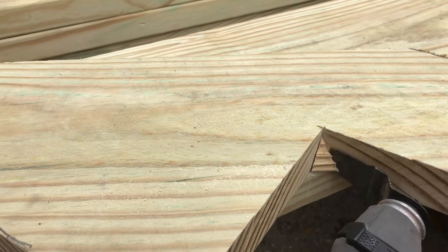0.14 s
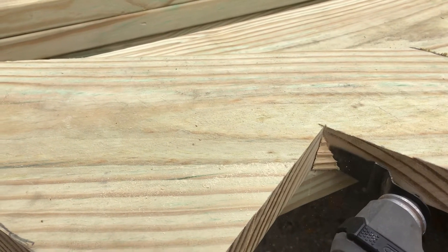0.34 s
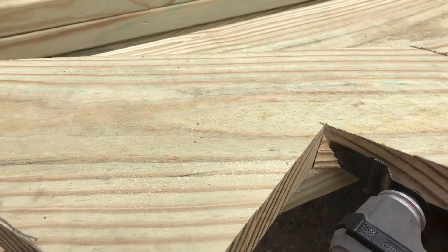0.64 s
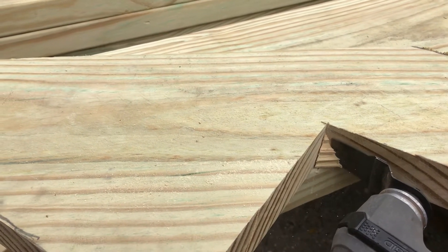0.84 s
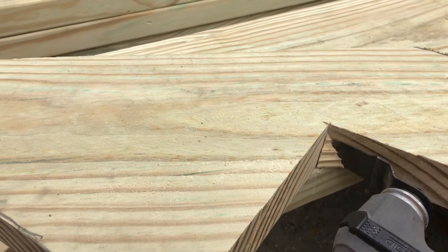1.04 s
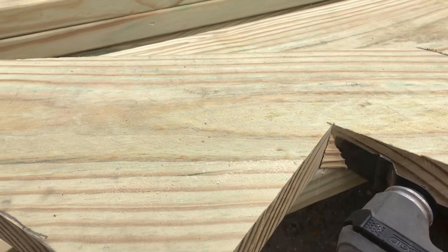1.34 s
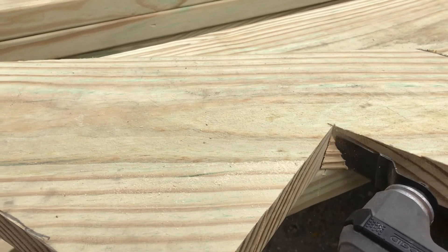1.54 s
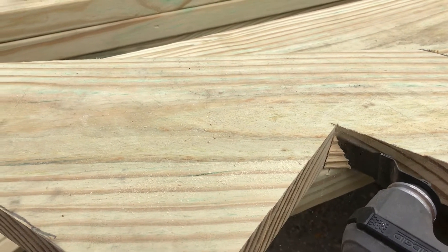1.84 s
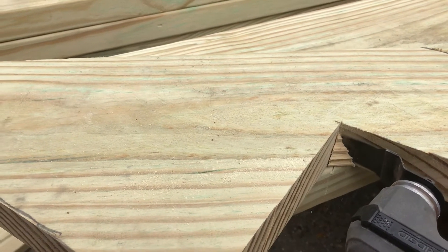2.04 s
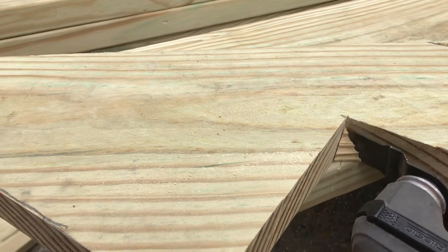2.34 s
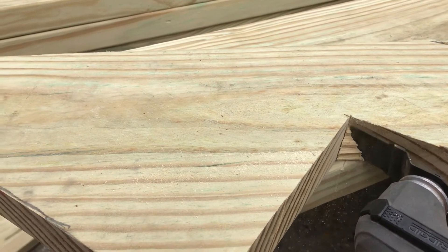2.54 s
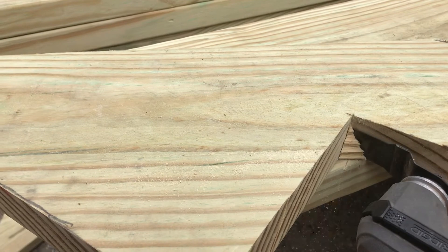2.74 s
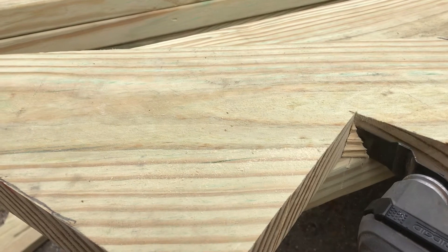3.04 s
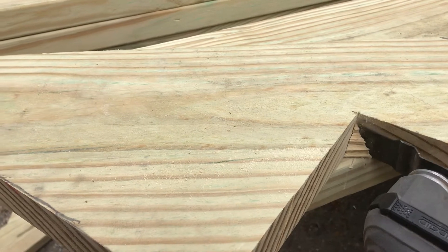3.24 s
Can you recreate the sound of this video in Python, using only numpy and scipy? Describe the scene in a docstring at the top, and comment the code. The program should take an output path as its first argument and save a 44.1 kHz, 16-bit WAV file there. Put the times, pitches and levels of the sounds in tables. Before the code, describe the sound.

Close, raspy power-tool buzz sawing wood, its pitch sagging twice under load and recovering.

```python
"""An oscillating multi-tool saws a thick board, heard close up in mono through a phone.
The blade swings about 270 times a second and sags under load; each swing sounds a stack of overtones
as sine partials with their own swells and wavering. The teeth rasp through the wood on both strokes:
hiss and small clicks, gated by the swing. A faint rumble of shaped noise and a few low, falling
sine bumps lie underneath."""
import sys
import numpy as np
from scipy import signal
from scipy.fft import rfft, irfft, next_fast_len
from scipy.io import wavfile
from scipy.ndimage import uniform_filter1d

SR = 44100
rng = np.random.default_rng(int(sys.argv[2]) if len(sys.argv) > 2 else 0)


def dump(signal):
    """Clip the signal to [-1, 1] and save it as 16-bit WAV at the path in sys.argv[1]."""
    limited = np.clip(np.atleast_2d(signal).T, -1, 1)
    pcm = np.round(limited * 32767).astype(np.int16)
    wavfile.write(sys.argv[1], SR, pcm)


def invert_db(level):
    """Linear amplitude ratio for a level in decibels (20 dB per decade), elementwise."""
    return 10 ** (np.asarray(level, dtype=float) / 20)


N = 149940
TIME_S = np.arange(N) / SR
FREE_HZ = 272  # swing rate of the unloaded blade
CUTOFF_HZ = 15740  # top of the sound


def curve(table, col):
    """Column of a time table, one value a sample."""
    a = np.array(table, float)
    return np.interp(TIME_S, a[:, 0], a[:, col])


def shape_db(table, hz):
    """Spectrum table read on a log frequency axis."""
    a = np.array(table, float)
    return np.interp(np.log(np.maximum(hz, 1)), np.log(a[:, 0]), a[:, 1])


def colour(x, gain):
    """Filter by a gain that is a function of Hz."""
    n = next_fast_len(N)
    hz = np.arange(n // 2 + 1) * SR / n
    return irfft(rfft(x, n) * gain(hz), n)[:N]


def unit(x):
    """Scale to rms 1."""
    return x / np.sqrt(np.mean(x ** 2))


def walk(rate_hz):
    """Random levels, held and smoothed twice into a slow wander of rms 1."""
    hold = int(SR / rate_hz)
    w = np.repeat(rng.standard_normal(N // 200), hold)[:N]
    return unit(uniform_filter1d(uniform_filter1d(w, hold), hold))


def above(hz, edge_hz):
    """Smooth step from 0 below the edge to 1 above it."""
    return 1 / (1 + (edge_hz / np.maximum(hz, 1)) ** 10)


def flare_db(rows):
    """Flat-topped swells and dips in dB, from rows of centre, half length and gain."""
    return sum(db * np.exp(-((TIME_S - s) / max(half, .008)) ** 4) for s, half, db in rows)


def lost_speed(swing_hz, most=1):
    """Load on the blade as the share of its free speed that is lost."""
    return np.clip(1 - swing_hz / FREE_HZ, 0, most)


# Swing rate of the blade before jitter: (time [s], rate [Hz])
SWING_RATE = [(0.0, 272.2), (0.13, 272.0), (0.3, 266.9), (0.5, 271.1), (0.965, 270.5), (1.01, 252.2),
              (1.045, 244.4), (1.08, 244.4), (1.18, 234.8), (1.24, 240.2), (1.27, 246.5), (1.29, 262.7),
              (1.32, 268.5), (1.53, 269.9), (1.7, 271.7), (2.05, 272.9), (2.18, 268.5), (2.27, 251.4),
              (2.45, 244), (2.57, 231.5), (2.66, 227.8), (2.75, 219.1), (2.91, 179.8), (3.03, 165.6),
              (3.085, 167.1), (3.12, 186.6), (3.19, 256.1), (3.22, 272), (3.4, 272.0)]


def blade_swing():
    """The motor sags under load and its rate jitters more; gives the rate and the running angle."""
    jitter, load_jitter = 0.00098, 0.0153  # share of the rate; extra per share of speed lost
    rate_hz = curve(SWING_RATE, 1)
    swing_hz = rate_hz * (1 + (jitter + load_jitter * lost_speed(rate_hz)) * walk(40))
    return swing_hz, 2 * np.pi * np.cumsum(swing_hz) / SR


# Single overtones that ring up or fade, by overtone number: (centre [s], half length [s], gain [dB])
OVERTONE_FLARES = {2: [(2.72, 0.049, -2)], 3: [(2.725, 0.029, 6), (3.02, .12, -0.5)], 4: [(.1, 0.2, 5),
                   (2.38, .17, 3), (3.185, 0.02, 9), (3.3, 0.077, -3)], 5: [(2.62, 0.12, 3.5),
                   (3.18, 0.012, 7), (3.25, .05, 5.5)], 6: [(.78, 0.25, 4), (1.13, 0.024, 5),
                   (1.3, 0.015, 5.5), (1.68, 0.066, -5), (2.125, 0.012, 6.5), (3.25, .12, -3)],
                   7: [(.78, 0.25, 3.5), (1.3, 0.024, 3.5), (1.87, 0.21, -5), (2.4, 0.11, 4.5),
                   (3.185, .025, 6)], 8: [(.08, .12, -9), (.48, .1, 5), (1.43, 0.16, 6.5),
                   (1.72, 0.18, 5.5), (2.125, 0.017, 9), (3.23, 0.027, 9)], 9: [(.75, 0.29, -3),
                   (1.75, .14, 5.5), (2.4, 0.058, 4)], 10: [(.1, .1, 1.5), (.8, 0.32, -4.5),
                   (1.22, .03, 11), (2.6, 0.094, 12.5)], 11: [(3.03, 0.049, 3)], 12: [(1.05, 0.32, -6),
                   (2.45, 0.098, -6)], 13: [(1.45, 0.22, -5)], 14: [(.83, .15, 2), (1.1, 0.099, -5)],
                   15: [(1.0, .15, -5), (1.485, .025, 8.5), (1.56, 0.022, 11.5), (1.75, .17, 6.5)],
                   16: [(1.17, 0.11, 5), (1.5, .09, 1)], 17: [(.1, 0.054, 2), (.93, 0.064, 12.5),
                   (1.47, 0.11, 5)], 20: [(.62, 0.22, 6)], 23: [(1.45, 0.11, 11)]}


def overtone_flare_db(k):
    """Swells and dips of overtone k alone."""
    return flare_db(OVERTONE_FLARES.get(k, []))


LOAD_WANDER_DB = 11.5  # extra wavering of the lowest partials per share of speed lost

# Levels before flares and wavering: (time [s], first partial [dB], second [dB], third [dB],
# growl under 1.5 kHz [dB each overtone], board buzz to 2.5 kHz [dB each overtone]); buzz() plays the last two
LOW_PARTIALS = [(0.0, -46.5, -62, -40.5, -41, -36.5), (0.2, -51.5, -56, -31, -45, -34),
                (0.27, -50.5, -42.5, -35, -46, -44), (0.38, -44.5, -41.5, -35, -50, -41.5),
                (0.5, -46.5, -53, -33.5, -37.5, -35.5), (0.56, -46.5, -52, -35, -40.5, -41.5),
                (0.7, -50, -58, -34.5, -42.5, -37.5), (0.97, -51.5, -52, -35, -41, -32.5),
                (1.05, -48, -52, -47, -43.5, -36), (1.13, -49, -48, -38.5, -41.5, -39.5),
                (1.22, -45.5, -47.5, -45.5, -41, -40.5), (1.3, -49, -43.5, -33.5, -38.5, -33.5),
                (1.55, -50.5, -44, -31, -44, -37), (1.7, -54, -40.5, -30.5, -38, -37),
                (1.9, -49.5, -44, -34.5, -41, -39.5), (2.1, -49, -44.5, -35.5, -38.5, -36),
                (2.22, -51, -45, -38, -37, -36.5), (2.32, -51, -53.5, -40.5, -33.5, -35),
                (2.55, -49, -43, -42, -35, -42), (2.68, -64, -40.5, -44, -38.5, -40.5),
                (2.77, -55, -34.5, -43, -35.5, -34.5), (2.86, -41, -55, -55, -36, -57),
                (2.95, -43, -49.5, -46, -39.5, -46), (3.04, -61, -52, -49, -37.5, -36),
                (3.11, -43, -49, -49, -35.5, -45), (3.18, -50, -42, -37, -38, -37.5),
                (3.26, -60, -49, -33, -32, -32), (3.4, -49, -52, -40, -47, -53)]


def hum(phase, swing_hz):
    """The three lowest partials of the swing, clean sines that surge more under load."""
    wander_db = 1.34 + LOAD_WANDER_DB * lost_speed(swing_hz, .2)
    out = 0
    for k in range(1, 4):
        db = curve(LOW_PARTIALS, k) + overtone_flare_db(k) + wander_db * walk(17)
        out = out + np.sqrt(2) * invert_db(db) * np.sin(k * phase + rng.uniform(0, 2 * np.pi))
    return out


# Colour of overtones above the third, board below 2.5 kHz and blade above: (frequency [Hz], gain [dB])
BUZZ_COLOUR = [(700,-6),(1080,-0.5),(1230,3),(1380,-4),(1630,1),(1900,-2),(2170,-6),(2450,-7.5),(2700,-6),(3200,-6.5),(3800,-2.5),(4200,-5.5),(4600,-7.5),(5000,-6),(5400,-8),(6300,-14),(7500,-27)]


def buzz(phase, swing_hz):
    """Upper overtones of the swing, coloured by board and blade, each wavering alone."""
    growl_edge_hz, board_edge_hz = 1480, 2500
    wander_hz, blade_wander_db, drift_rad = 15, 1.5, 0.95  # drift is for an overtone near 4500 Hz
    growl_db, board_db = curve(LOW_PARTIALS, 4), curve(LOW_PARTIALS, 5)
    blade_db = curve(CUT_LEVELS, 5)
    load_wander_db = LOAD_WANDER_DB / 4 * lost_speed(swing_hz)
    out = 0
    for k in range(4, 30):
        hz = k * swing_hz
        past_growl, past_board = above(hz, growl_edge_hz), above(hz, board_edge_hz)
        db = shape_db(BUZZ_COLOUR, hz) + overtone_flare_db(k)
        db = db + (1 - past_growl) * growl_db + (past_growl - past_board) * board_db
        db = db + past_board * blade_db
        db = db + (1.4 + past_board * blade_wander_db + load_wander_db) * walk(wander_hz)
        drift = drift_rad * walk(40) * (k * FREE_HZ / 4500) ** 2  # higher overtones blur more
        out = out + np.sqrt(2) * invert_db(db) * np.sin(k * phase + rng.uniform(0, 2 * np.pi) + drift)
    return out


# The blade bites or skips and all overtones jump: (centre [s], half length [s], gain [dB])
BLADE_BITES = [(1.022, .012, -5), (1.085, 0.011, -1.5), (1.13, 0.014, 5), (1.335, 0.013, -5),
               (2.17, 0.013, -5), (2.245, .015, -4), (2.9, 0.045, -2.5), (3.125, 0.033, -3.5)]


def bites(tones):
    """The blade bites or skips, lifting or dropping all overtones together."""
    return tones * invert_db(flare_db(BLADE_BITES))


PATCH_HZ = 900  # spacing of the rasp's patches


def teeth():
    """Teeth tear fibres: steady hiss plus random clicks of either sign and uneven size."""
    per_s, spread_db, cap_db = 9000, 2.5, 11  # mean click rate; mean and greatest size over the smallest
    clicks_db = -6  # all clicks against the hiss
    chance = rng.random((N, 3)).T
    size_db = np.minimum(-spread_db * np.log(chance[2] + 1e-9), cap_db)
    clicks = unit((chance[0] < per_s / SR) * np.sign(chance[1] - .5) * invert_db(size_db))
    return rng.standard_normal(N) + invert_db(clicks_db) * clicks


# Parts of the rasp that ring up or fade: (centre [s], half length [s], frequency [Hz], gain [dB])
RASP_RINGS = [(0.79, 0.41, 5450, 4.5), (0.45, 0.24, 4600, -3.5), (1.2, .12, 3000, -6), (1.4, .08, 2900, 1),
              (1.705, .35, 8840, 5.5), (3.264, 0.12, 4700, 2.5), (2.98, 0.18, 3200, 3.5),
              (3.22, .08, 3700, -4.5)]


def patches(source):
    """Splits the rasp into overlapping bands that ring, fade and flicker one by one."""
    out = 0
    for centre in np.arange(0, CUTOFF_HZ + PATCH_HZ, PATCH_HZ):
        patch = colour(source, lambda f: np.maximum(1 - np.abs(f - centre) / PATCH_HZ, 0))
        # a ring fades with its distance from the patch
        near = [(s, half, db * (1 - abs(hz - centre) / PATCH_HZ))
                for s, half, hz, db in RASP_RINGS if abs(hz - centre) < PATCH_HZ]
        flicker_db = 1 * walk(18) + .5 * walk(4.17)  # fast and slow
        out = out + patch * invert_db(flare_db(near) + flicker_db)
    return out


# Edges between the four regions of the rasp: [Hz]
REGION_EDGES = [2200, 4950, 7000]
# Colour of the rasp, relative within each region: (frequency [Hz], density [dB per Hz])
RASP_COLOUR = [(100,-31),(365,-27),(507,-22),(731,-18),(1070,-11.5),(1600,-8),(2100,-9),(2560,-10.5),(3000,-6.5),(3800,-0.5),(4500,2),(4950,-3.5),(5450,-1),(6400,-4),(7030,-6.5),(7900,-2.5),(8700,3),(9500,2.5),(10400,-4.5),(11400,6),(12500,10.5),(13800,12.5),(14600,2.5),(15700,7)]
# The cut: (time [s], rasp under 2 kHz [dB], 2-5 kHz [dB], 5-7 kHz [dB], above 7 kHz [dB],
# blade overtones [dB each]); rasp levels before flicker, the last column sounds in buzz()
CUT_LEVELS = [(0,-39.5,-27,-31.5,-27,-35.5),(.17,-43,-34,-31.5,-26.5,-30),(.22,-34.5,-26.5,-35,-25.5,-43),(.36,-37,-26.5,-30.5,-29.5,-35.5),
              (.52,-39,-28,-32,-27.5,-32.5),(.6,-33.5,-26,-31,-28,-34.5),(.85,-36,-28,-31,-28,-34.5),(.96,-40.5,-30,-31.5,-27,-30),
              (1.0,-38,-28,-32.5,-31.5,-31),(1.04,-38,-31.5,-31.5,-30.5,-35),(1.2,-39,-32,-31,-29,-33.5),(1.26,-36.5,-26,-30.5,-25,-40),(1.31,-37,-26.5,-30.5,-30,-31),(1.38,-39.5,-34.5,-29.5,-29,-34.5),
              (1.55,-42.5,-30,-33,-28.5,-30),(1.62,-36,-27.5,-32.5,-28,-34),(1.9,-32,-28,-32,-28,-41),(2.15,-33.5,-30,-29,-27.5,-35),
              (2.23,-30.5,-30,-28,-27.5,-35.5),(2.38,-35.5,-32.5,-30,-26,-35.5),(2.7,-34,-31,-29,-28.5,-40.5),(2.82,-34.5,-33,-29.5,-32,-48),
              (2.93,-33.5,-38,-32.5,-33.5,-48),(3.02,-43,-38,-30.5,-30.5,-37.5),(3.09,-37,-38,-30,-30,-39.5),(3.14,-28,-29,-31.5,-25,-42),(3.19,-30,-27.5,-27,-22,-31),(3.28,-29.5,-27,-28,-26,-36),
              (3.4,-28.5,-27.5,-31,-27.5,-57)]


def rasp(phase):
    """The torn fibres hiss in pulses, as the swing gates the teeth twice and once a cycle."""
    stroke_depth, swing_depth, stroke_lag = .4, .3, 1.7  # twice, once [log gain]; lag [rad]
    edges = [1e-3] + REGION_EDGES + [1e9]
    shared_flicker_db = 0.73 * walk(40.0)
    patchy = patches(teeth())
    out = 0
    for k, depth in enumerate([0.2, 0.82, 0.91, 1.03]):  # share of the gating in each region
        angle = phase + 0.075 * k + 0.71 * walk(8.2)
        strokes = stroke_depth * np.cos(2 * angle)
        swings = swing_depth * np.cos(angle + stroke_lag + 2.54 * walk(2.74))
        gate = np.exp(depth * (strokes + swings))

        def region(f):
            inside = np.maximum(above(f, edges[k]) - above(f, edges[k + 1]), 0)
            return invert_db(shape_db(RASP_COLOUR, f)) * np.sqrt(inside)

        level_db = curve(CUT_LEVELS, k + 1) + shared_flicker_db
        out = out + unit(colour(gate * patchy, region)) * invert_db(level_db)
    return out


# Low rumble as (colour, starting level [dB]); the colour lists (frequency [Hz], density [dB per Hz])
RUMBLE_COLOUR, RUMBLE_DB = [(12, -74), (22, -33), (49, 3.5), (118, -7.5), (300, -24), (510, -120)], -69.5


def rumble():
    """Faint low noise that wavers and rises over the whole cut."""
    rise_db, wander_db = 6, 3.5
    noise = rng.standard_normal(N)
    low = unit(colour(noise, lambda f: invert_db(shape_db(RUMBLE_COLOUR, f)) * (1 - above(f, 180))))
    return low * invert_db(RUMBLE_DB + rise_db * np.arange(N) / N + wander_db * walk(9.4))


# Low bumps: (start [s], level before rise and decay [dB], settled pitch [Hz])
LOW_BUMPS = [(1.606,-41,98),(3.202,-41,89.95),(3.24,-45,80),(3.35,-30,52)]


def bumps():
    """Soft thumps: decaying sines whose pitch starts high and drops at once."""
    rise_s, t60_s = 0.0027, 0.11
    sag, sag_s = 3.5, 0.0063  # starts this share above the settled pitch; time constant of the drop
    out = 0
    for s, db, hz in LOW_BUMPS:
        t = np.maximum(TIME_S - s, 0)
        envelope = (1 - np.exp(-t / rise_s)) * np.exp(-np.log(1000) * t / t60_s)
        turns = hz * (t + sag * sag_s * (1 - np.exp(-t / sag_s)))
        out = out + invert_db(db) * envelope * np.sin(2 * np.pi * turns)
    return out


def scene():
    """Blade, board, teeth and low end all reach one microphone."""
    swing_hz, phase = blade_swing()
    tones = bites(hum(phase, swing_hz) + buzz(phase, swing_hz))
    mono = tones + rasp(phase) + rumble() + bumps()
    return np.array([mono, mono])


def band_limit(x):
    """A steep low-pass at the top of the band."""
    return signal.sosfilt(signal.butter(12, 17010, fs=SR, output="sos"), x)


def record(dry):
    """A phone hears in mono, cut off sharply at the top."""
    mono = colour(dry[0], lambda f: 1. * (f < CUTOFF_HZ))
    return band_limit(np.array([mono, mono]))


dry = scene()
out = record(dry)
dump(out)
```